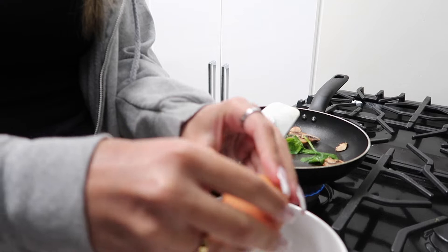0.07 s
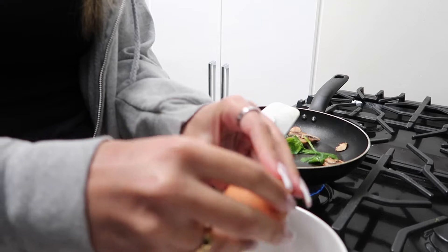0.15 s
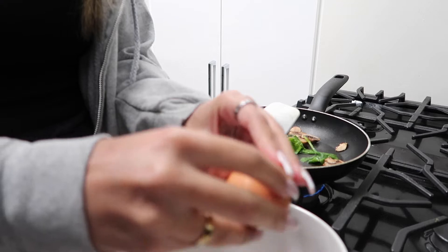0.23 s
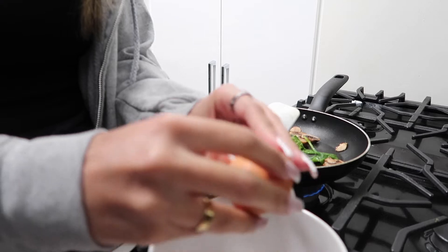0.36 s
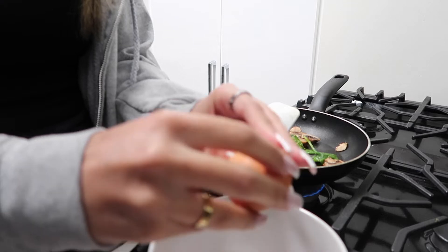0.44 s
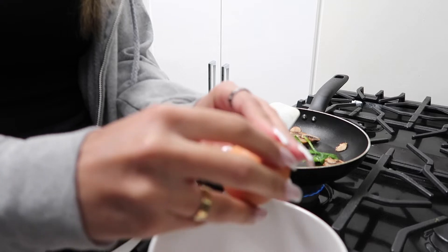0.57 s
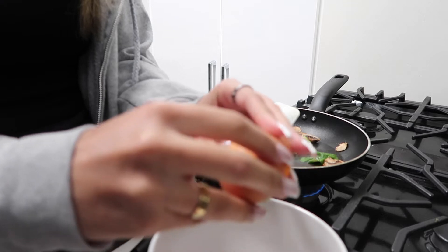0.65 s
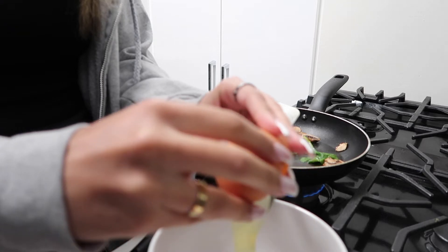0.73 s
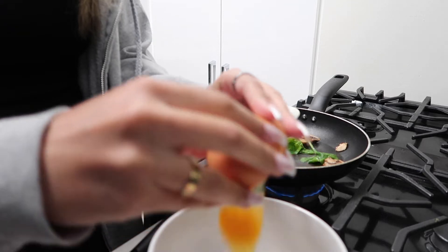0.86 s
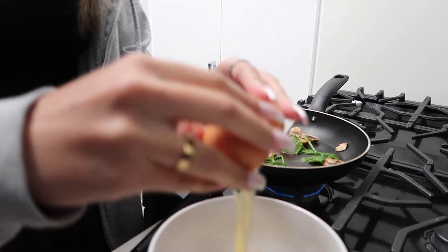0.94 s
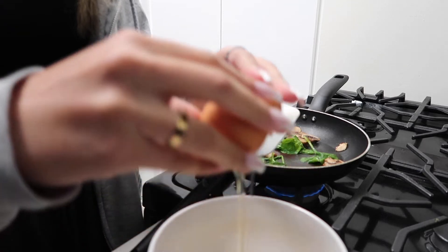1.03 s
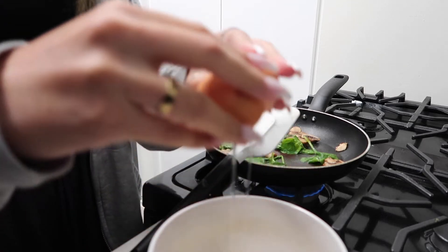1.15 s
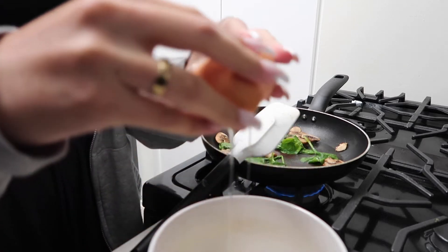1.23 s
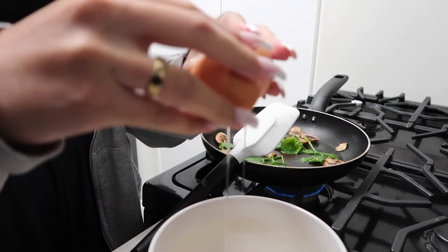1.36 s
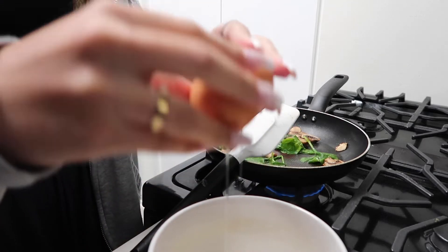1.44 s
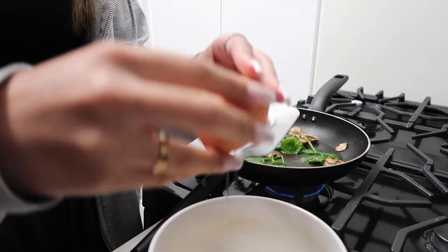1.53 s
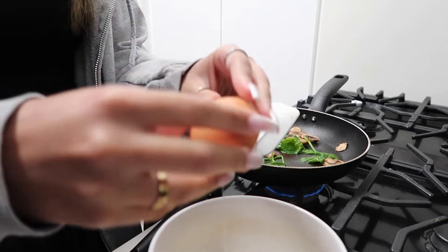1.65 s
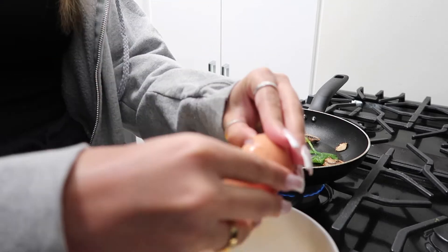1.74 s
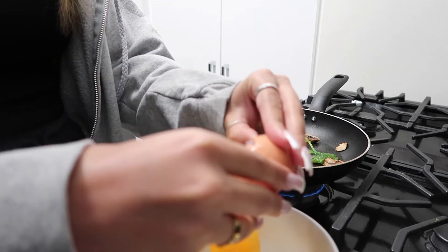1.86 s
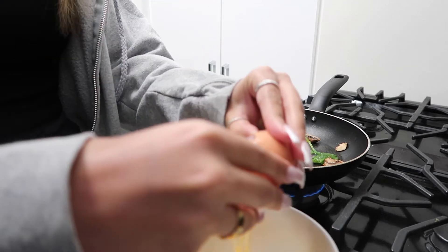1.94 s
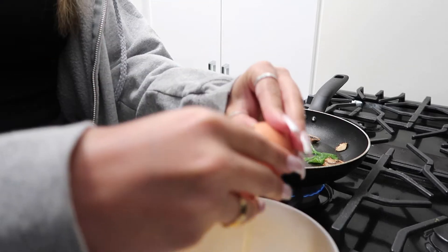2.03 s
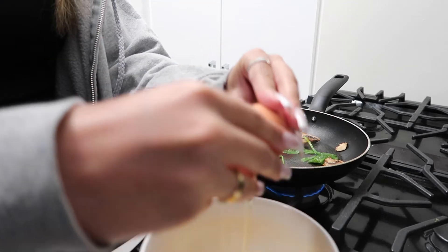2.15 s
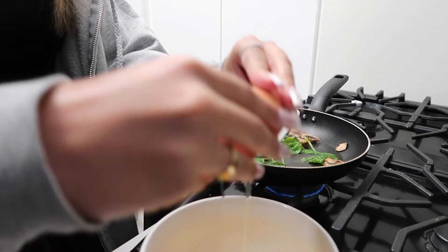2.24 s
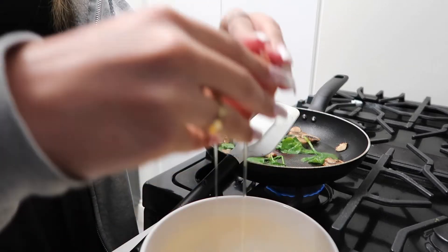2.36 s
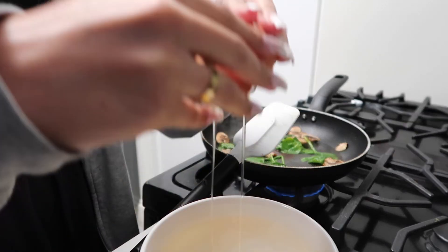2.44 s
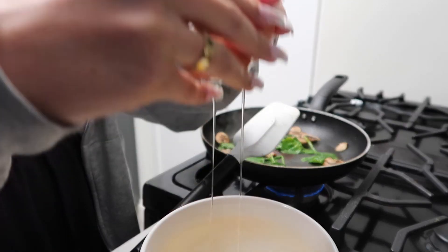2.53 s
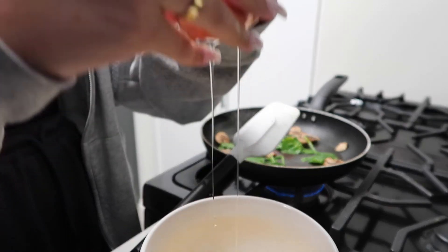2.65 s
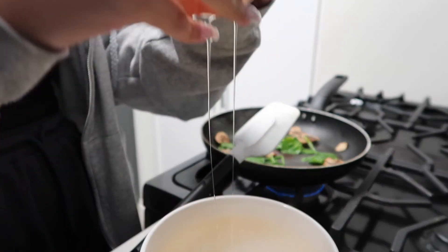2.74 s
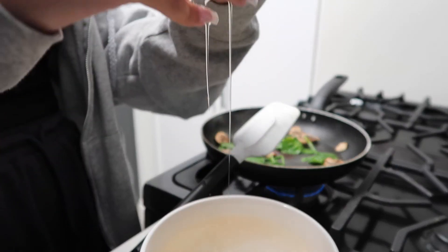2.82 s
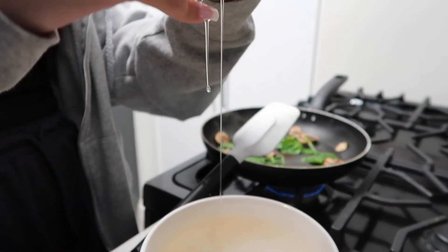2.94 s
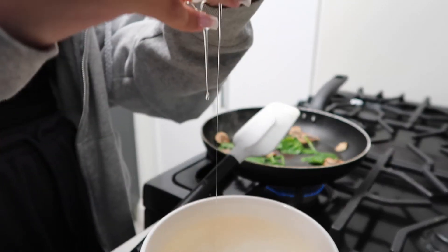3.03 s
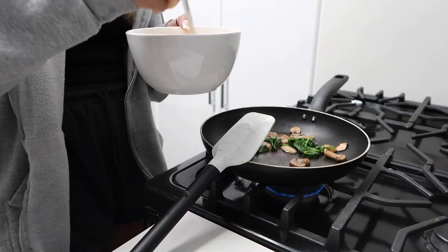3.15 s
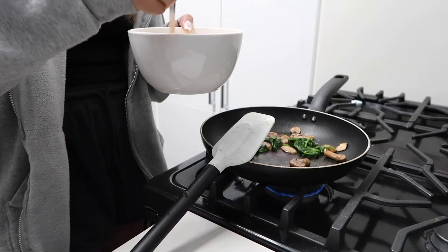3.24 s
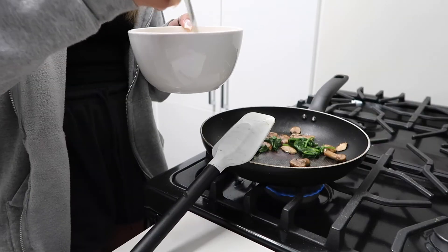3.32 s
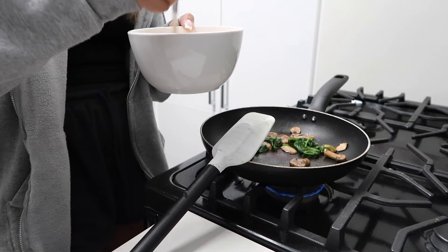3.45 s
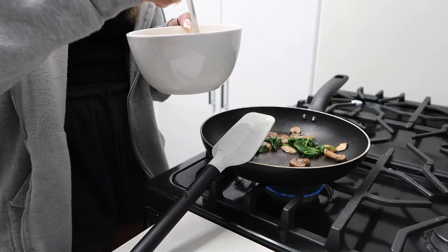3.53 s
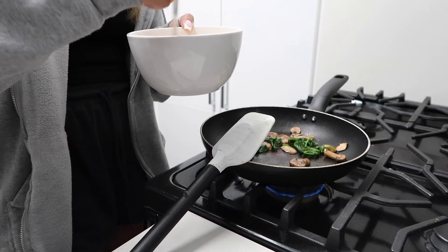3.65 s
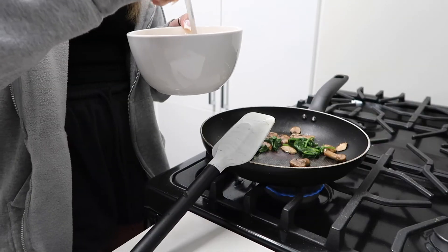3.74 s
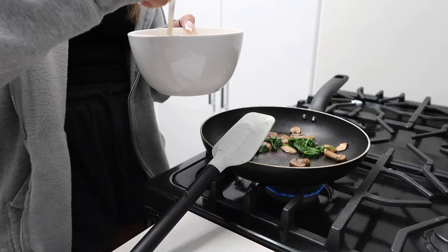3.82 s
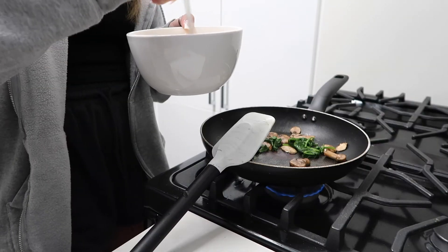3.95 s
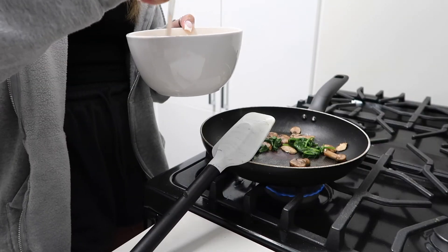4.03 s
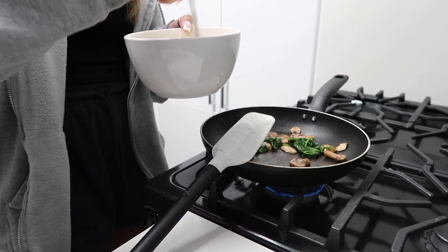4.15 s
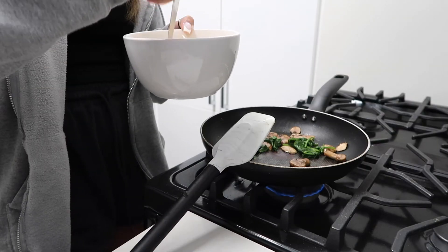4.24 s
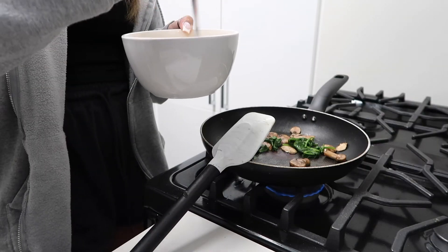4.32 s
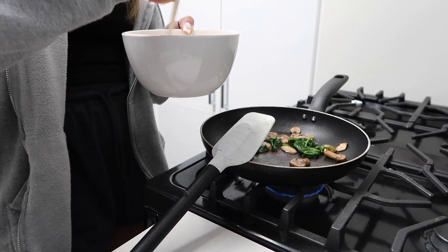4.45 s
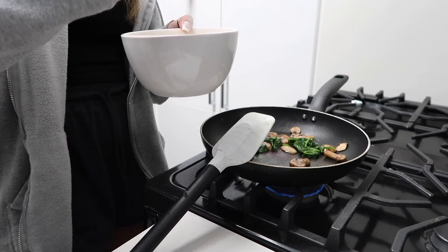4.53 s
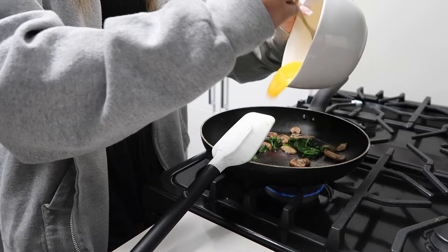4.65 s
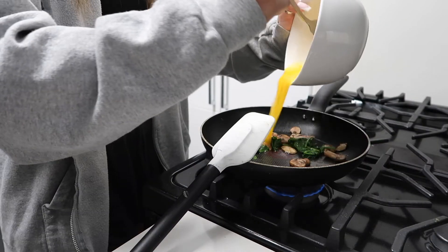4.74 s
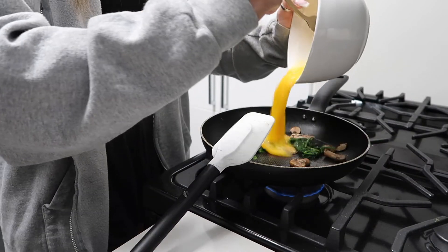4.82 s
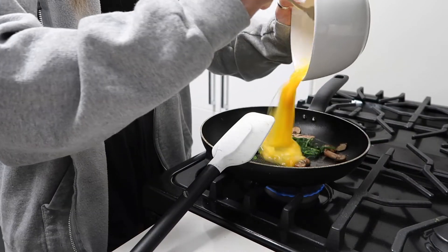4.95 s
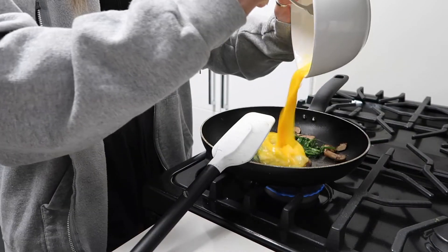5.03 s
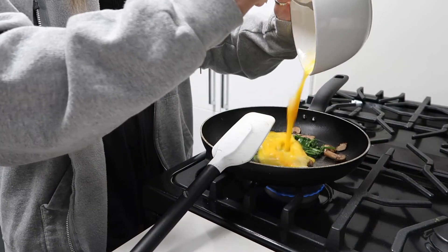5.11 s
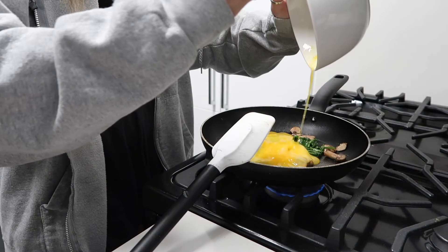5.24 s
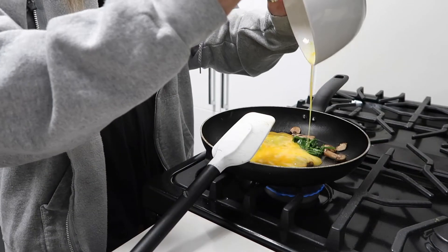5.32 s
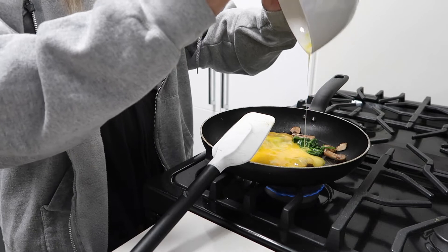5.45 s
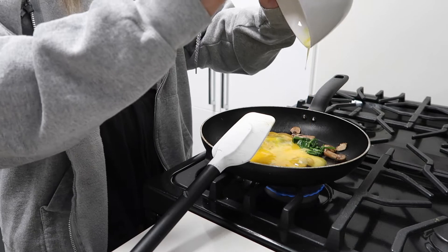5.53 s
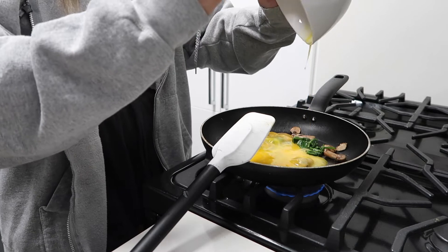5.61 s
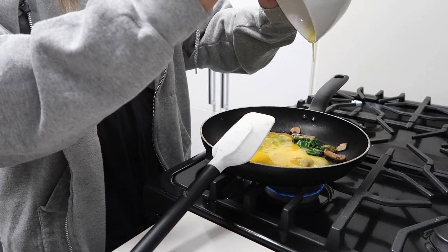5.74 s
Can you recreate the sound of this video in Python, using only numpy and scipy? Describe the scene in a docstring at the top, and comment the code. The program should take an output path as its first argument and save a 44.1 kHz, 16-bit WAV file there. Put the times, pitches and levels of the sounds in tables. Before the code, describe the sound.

Eggs crack sharply and crumble open over an extractor hum, a fork rings a ceramic bowl seven times, then egg plops softly into a pan.

```python
"""In a kitchen with an extractor fan and a gas hob, eggs are cracked, beaten and poured into a warm pan.
Shells snap and crumble as short damped knocks and bursts of noise; a fork rings a ceramic bowl seven times,
made of decaying sine waves. The egg slides in over filtered noise, a low hum and a faint sizzle of bubbles.
A gain control turns loud moments down in three separate parts: cracking, beating and pouring."""
import sys
import numpy as np
from scipy import signal
from scipy.fft import rfft, irfft, next_fast_len
from scipy.io import wavfile
from scipy.ndimage import uniform_filter1d

SR = 44100
rng = np.random.default_rng(int(sys.argv[2]) if len(sys.argv) > 2 else 0)


def file_out(sig):
    """Save sig as 16-bit WAV at sys.argv[1]."""
    # one column per channel
    cols = np.atleast_2d(sig).T
    # limit, then scale
    lim = np.clip(cols, -1, 1)
    pcm = np.round(lim * 32767).astype(np.int16)
    wavfile.write(sys.argv[1], SR, pcm)


N = 254898
T = np.arange(N) / SR  # time (s)
RING, BRIEF = T[:SR // 2], T[:SR // 8]  # time within a long and a short sound (s)

# Colour of the extractor fan and gas flame. Each row: frequency in Hz, relative level in dB.
KITCHEN_COLOUR = [(20, -23.5), (40, -8.5), (55, -14.5), (78, -7), (125, -5), (220, -5), (370, -13.5),
                  (420, -16), (600, -15.5), (780, -24.5), (1250, -28), (2700, -29), (6000, -43.5),
                  (15000, -57.5)]
# Tones of the hum. Each row: frequency in Hz, level in dB.
HUM_TONES = [(77, -50.5), (154.5, -40), (350, -51), (540, -57.5)]

# The egg covers the hot pan: start (s), time it takes (s), change in the hiss (dB)
COVER_AT_S, COVER_S, COVER_DB = 4.9, 0.58, -8.5
# Fine spray of the frying vegetables. Each row: frequency in Hz, relative level in dB.
SPRAY_COLOUR = [(2000, -14.5), (5000, -9), (8000, 9), (12000, -19), (15000, -18)]
# Egg landing in the pan, with pockets of air and spits of fat.
# Each row: start in seconds, length in seconds, level in dB, pitch in Hz.
EGG_SPLATS = [(4.887, .08, -42, 720), (4.988, .01, -45, 1700), (5.141, 0.014, -45.5, 7040),
              (5.203, 0.072, -44, 753)]

# Eggshell snaps. Each row: start in seconds, pitch of the hollow egg in Hz, its level in dB,
# pitch of the shell in Hz, its level in dB, splinter level in dB, splinter tilt in dB per octave,
# crack level in dB.
SHELL_SNAPS = [(0.3451, 3700, -28.5, 5130, -30, -34.5, 9, -38),
               (0.509, 2130, -35.5, 3780, -23, -42, 10, -36), (0.569, 1914, -35, 3020, -26.5, -42, -2, -42),
               (0.620, 2370, -19, 3500, -40, -44, 5, -40), (0.6302, 2240, -7.5, 3520, -25, -28, 18, -16.5),
               (1.0107, 1650, -11.5, 3520, -10.5, -30.5, 4, -24),
               (1.1464, 2110, -17.5, 3770, -43, -34, 7, -18),
               (1.552, 1990, -13.5, 2580, -14.5, -26, -1, -18),
               (1.758, 2570, -39, 3750, -25, -36.5, 15, -27.5), (2.044, 3040, -42, 3830, -28, -49, -7, -44),
               (2.049, 3650, -17, 4380, -28, -42, -5, -28)]
# Colour of the splinters before the tilt. Each row: frequency in Hz, relative level in dB.
SPLINTER_COLOUR = [(500, -37), (1500, 10.5), (3000, 3), (6500, 0), (10000, -19.5), (16000, -41)]
# Colour of the sudden crack. Each row: frequency in Hz, relative level in dB.
CRACK_COLOUR = [(800, -32), (1800, 4.5), (2800, 0), (5000, -5), (7500, -17), (11000, -22), (16000, -34)]
# Flakes of shell giving way as the thumbs pull the halves apart.
# Each row: start in seconds, length in seconds, level in dB, pitch in Hz.
SHELL_CRACKLES = [(0.085, 0.015, -31, 3000), (0.13, 0.0065, -29.5, 4760), (0.673, 0.006, -26, 2320),
                  (0.69, 0.013, -28, 3900), (0.881, .008, -39, 1900), (0.903, 0.016, -36, 2350),
                  (.9628, .008, -35, 5500), (1.387, 0.00495, -37, 2300), (1.445, 0.011, -33, 2400),
                  (1.608, 0.014, -30, 2380), (1.621, 0.008, -26.5, 3500), (1.623, .018, -29, 1250),
                  (1.636, .014, -31, 2700)]
# Rings around the snaps: the opened shell, and near 4.2 kHz the bowl, brushed by the shell.
# Each row: start in seconds, pitch in Hz, level in dB, time to fade by 60 dB in seconds,
# sag as a share of the pitch, wobble as a share of the pitch.
SNAP_RINGS = [(0.634, 2165, -23, 0.15, 0.072, 0.051), (1.017, 1320, -16.5, 0.022, 0.099, 0.043),
              (.964, 4250, -44, .08, 0.037, .015), (1.013, 4170, -42.5, 0.32, .005, .003),
              (1.152, 2100, -31, .06, .06, 0.093), (1.558, 1860, -22.5, 0.094, .02, .06)]

BEAT_START, BEAT_END = 3.09, 4.583  # the fork is heard between these times (s)
# Blows of the fork on the bowl. Each row: start in seconds, force in dB, clack in dB relative to the force,
# clack fade by 60 dB in seconds, contact time in seconds, tine pitch in Hz, tine level in dB relative
# to the force, thud in dB relative to the force, later swell of the second rim family in dB,
# then the level in dB of each of the four rim families, set by where the fork lands.
FORK_BLOWS = [(3.1239, -18, 13, 0.031, 0.0015, 12300, -3, 2, 5.5, 0, -3, 0, -2.5),
              (3.32, -15, 12.8, 0.019, 0.00072, 12200, -6.5, -1.5, 7, -2, -1, -2.5, 0),
              (3.5152, -14.5, 13.5, 0.029, 0.0015, 12200, -7, 0, 5.5, -7, -1.5, -0.5, -7.5),
              (3.7244, -15.5, 9.2, 0.031, 0.0012, 12800, -7, -0.5, 7, -2, -6, -7.5, -3.5),
              (3.9126, -22.5, 19.9, 0.026, 0.00076, 14000, 9.5, 6, 0.5, 0, 4.5, 2, -6),
              (4.1106, -20, 17.9, 0.023, 0.0011, 13900, 7.5, -1.5, 1.5, -2.5, -7, 1, 1),
              (4.3351, -23.5, 9.5, 0.059, 0.0021, 13400, 4, 0, -3, 2.5, -0.5, 1, -4.5)]
# Ceramic bowl: four main rim modes (ways of ringing), then their close partners and the high modes.
# Each row: frequency in Hz, relative level in dB, time to fade by 60 dB in seconds.
BOWL_MODES = [(1053, -1.3, 1.4), (2616, 3.8, .46), (4740, -1, .22), (7320, -1.5, .18), (2619, -11, 1.0),
              (4733, -19, .7), (7330, -25, .5), (2580, -19, .2), (4770, -12, .35), (4700, -9, .22),
              (4620, -4, .07), (4520, -15, .25), (4170, -17, .25), (5430, -24, .22), (6200, -23, .12),
              (7290, -13, .2), (8620, -13, .12), (10340, -5, .18)]
# Pitches that part the four families of rim modes, in Hz.
FAMILY_LIMITS_HZ = [2000, 3500, 6000]
# How strongly the steel tip drives each pitch. Each row: frequency in Hz, relative level in dB.
TIP_STRIKE = [(1050, -2.5), (2600, -2), (4700, 4), (7300, 5.5), (13000, -38)]
# The second rim family swells again (dips, if negative) shortly after the blow: delay (s), half length (s)
SWELL_AT_S, SWELL_S = 0.054, 0.042
# Steel tines. Each row: frequency in Hz, relative level in dB, time to fade by 60 dB in seconds.
STEEL_TINES = [(11550, -4, .14), (11950, 1, 0.12), (12480, -3, 0.08), (12890, -3, .07), (13150, -5, 0.12),
               (13830, -10, .14)]
TINE_REACH_HZ = 800  # tine modes this far from a blow's tine pitch ring at half strength
# Colour of the contact clack. Each row: frequency in Hz, relative level in dB.
CLACK_COLOUR = [(400, -15.5), (650, -8.5), (820, -13.5), (1080, -1.5), (1500, -7), (2000, -2.5), (2500, 10),
                (3300, -6), (3900, -7.5), (4600, 6), (5700, -8), (7300, 2.5), (9000, -14.5), (10200, -3.5),
                (11000, -14.5), (11700, -5.5), (13500, -5.5), (16000, -30)]
# The wall thuds while the fork still presses on it: pitch (Hz), swell (cycles)
THUD_HZ, THUD_CYCLES = 1055, 3.6
# The fork sweeps through the egg: lead before the blow (s), half length (s), level (dB)
SWEEP_LEAD_S, SWEEP_S, SWEEP_DB = 0.02, 0.023, -41
# Colour of the sweep. Each row: frequency in Hz, relative level in dB.
SWEEP_COLOUR = [(250, -10), (550, 9), (900, -2), (2500, -3), (7000, -5), (13500, -16), (16000, -30)]
# Tines grazing the bowl between blows. Each row: middle of the graze in seconds, level in dB.
TINE_GRAZES = [(3.428, -40), (3.998, -37), (4.224, -39), (4.447, -39.5), (4.566, -36.5)]
# Colour of the grazing tines. Each row: frequency in Hz, relative level in dB.
GRAZE_COLOUR = [(1500, -29), (3700, -24), (4250, 2), (4750, -4), (5400, -9), (7900, -10), (10000, -12),
                (15500, -32)]
GRAZE_S = 0.014  # half length of a graze (s)

# Gain control: reduction as the beating begins (dB), time over which loudness is sensed (s)
HELD_DB, SENSE_S = 6.5, .025
TOP_HZ = 16200  # nearly everything above this is cut


def undb(db):
    """Turn decibels into a plain gain."""
    return 10 ** (np.asarray(db) / 20)


def unit(x):
    """Scale to an rms (average strength) of 1."""
    return x / np.sqrt(np.mean(x ** 2))


def fade(t, t60):
    """Die away exponentially, by 60 dB in t60 seconds."""
    return np.exp(-np.log(1000) * t / t60)


def on_log(points, freqs):
    """Read between (Hz, value) points on a log-frequency axis."""
    f, value = np.transpose(points)
    return np.interp(np.log(freqs + 1), np.log(f), value)


def noise(points, size):
    """Make noise of rms 1, coloured by (Hz, relative dB) points."""
    spectrum = rfft(rng.standard_normal(size))
    colour = undb(on_log(points, np.fft.rfftfreq(size, 1 / SR)))
    return unit(irfft(spectrum * colour, size))


def walk(rate, size=N):
    """Drift at random about zero, with `rate` new values per second joined by straight lines."""
    knots = rng.standard_normal(int(size / SR * rate) + 2)
    return np.interp(T[:size] * rate, np.arange(len(knots)), knots)


def add(track, s, sound):
    """Mix a sound in at time s (seconds)."""
    i = int(s * SR)
    track[i:i + len(sound)] += sound[:N - i]


def knock(hz, cycles, sag=0):
    """A heavily damped resonance that swells for a few cycles and dies, sinking in pitch by sag."""
    age = BRIEF * hz / cycles
    swell = age * np.exp(1 - age)  # peak 1
    pitch = hz * (1 + sag * np.exp(-age / 2) - sag / 2)
    return swell * np.sin(2 * np.pi * np.cumsum(pitch) / SR)


def around(hz, octaves, draw):
    """Turn a random draw from 0 to 1 into a pitch up to some octaves above or below hz."""
    return hz * 2 ** (octaves * (2 * draw - 1))


def cluster(length, hz, cycles, spread_octaves, uneven_db, count):
    """A run of tiny knocks about one pitch; the first leads, the others follow at random and weaker."""
    out = np.zeros(len(RING))
    add(out, 0, knock(hz, cycles))
    for when, pitch, size in rng.random((count, 3)):
        add(out, when * length, undb(-uneven_db * size) * knock(around(hz, spread_octaves, pitch), cycles))
    return out


def room(x, wet_db, t60=0.18, near_db=-8, near_t60=0.085, gap=.005, width=0.18):
    """Direct sound, quick reflections from worktop and cupboards, and the short tail of the kitchen."""
    far = fade(RING, t60) * undb(wet_db) / np.sqrt(t60)
    near = fade(RING, near_t60) * undb(near_db) / np.sqrt(near_t60)
    tail = (far + near) * np.sqrt(2 * np.log(1000) / SR)
    wait = np.zeros(int(gap * SR))

    def echo():
        """Smear the sound with a fresh noisy tail."""
        return signal.fftconvolve(x, np.r_[wait, tail * rng.standard_normal(len(RING))])[:N]

    mid, side = echo(), echo()
    return x + mid + width * np.array([side, -side])


def covered():
    """Share of the pan that lies under egg, 0-1."""
    return np.clip((T - COVER_AT_S) / COVER_S, 0, 1)


def kitchen(rush_db=-35.5, side_db=-53, waver=0.2, wander_hz=3, hiss_edge_hz=1800):
    """The extractor hums and rushes unevenly; flame and pan hiss above it until the egg covers the pan."""
    rush = noise(KITCHEN_COLOUR, N) * undb(rush_db + 1.05 * walk(4.413))
    high_pass = signal.butter(1, hiss_edge_hz, "high", fs=SR, output="sos")
    hiss = signal.sosfilt(high_pass, rush)
    # the hiss is already in the rush, so only its change is added
    rush = rush + hiss * (undb(COVER_DB * covered()) - 1)
    hum = np.zeros(N)
    for hz, db in HUM_TONES:
        size = undb(db) * np.sqrt(2) * (1 + waver * walk(13))
        hum += size * np.sin(2 * np.pi * np.cumsum(hz + wander_hz * walk(20)) / SR)
    side_colour = [(50, 0.0), (130, -16.0), (230, 22.5), (450, 19.0), (900, 13.5),
                   (2000, 3), (5000, 7.5), (15000, -27.0)]  # (Hz, relative dB)
    side = undb(side_db) * noise(side_colour, N)  # opposite in left and right
    return rush + hum + np.array([side, -side])


def bubbles(count, start, end, hz, db, cycles, spread_db=3, spread_octaves=.35):
    """Small bubbles burst at random between two times, each a knock with its own pitch and strength."""
    out = np.zeros(N)
    for when, pitch, size in rng.random((count, 3)):
        level = undb(db - spread_db * np.log(size + 0.176))
        add(out, start + when * (end - start), level * knock(around(hz, spread_octaves, pitch), cycles))
    return out


def pan(spray_db=-63, smother_db=-10, late_hiss_db=-75, late_hiss_at_s=5.4, late_hiss_rise_s=0.33):
    """Vegetables sizzle; the egg plops in and smothers their spray; a very faint high hiss rises late."""
    sizzle = bubbles(count=480, start=0, end=5.25, hz=7500, db=-60, cycles=.6, spread_octaves=.7)
    spray = noise(SPRAY_COLOUR, N) * undb(spray_db + smother_db * covered())
    gurgle = bubbles(count=40, start=4.6, end=5.7, hz=1900, db=-54, cycles=2, spread_octaves=.6)
    # a very faint, uneven high hiss rises near the end
    late_hiss = noise([(4000, -25), (8000, -6), (12000, 3), (16000, -25)], N)  # (Hz, relative dB)
    late_hiss = late_hiss * unit(undb(5 * walk(900)))
    late_hiss = late_hiss * undb(late_hiss_db) * np.clip((T - late_hiss_at_s) / late_hiss_rise_s, 0, 1)
    splats = np.zeros(N)
    for s, length, db, hz in EGG_SPLATS:
        splat = cluster(length, hz, cycles=2.0, spread_octaves=0.36, uneven_db=2.0, count=6)
        add(splats, s, undb(db) * splat)
    return spray + room(sizzle + gurgle + splats + late_hiss, wet_db=-5.5)


def wobbling_ring(hz, t60, sag, wobble, sag_s=0.013, rise_s=0.0011, waver_db=3):
    """An opened shell or brushed bowl: an uneven fading sine that wobbles and settles onto its pitch."""
    pitch = hz * (1 + sag * np.exp(-RING / sag_s) + wobble * walk(450, len(RING)))
    size = (1 - np.exp(-RING / rise_s)) * fade(RING, t60) * undb(waver_db * walk(235, len(RING)))
    return size * np.sin(2 * np.pi * np.cumsum(pitch) / SR)


def shell_splinters(tilt, crumble_t60=0.06, grain_db=6):
    """Tiny splinters: fading noise whose loudness jumps at random every 32 samples."""
    steps = np.repeat(rng.standard_normal(len(BRIEF)), 32)[:len(BRIEF)]
    grains = unit(undb(grain_db * steps))
    colour = [(hz, db + tilt * np.log2(hz)) for hz, db in SPLINTER_COLOUR]
    return noise(colour, len(BRIEF)) * grains * fade(BRIEF, crumble_t60)


def eggshell(cavity_cycles=1.7, shell_cycles=2.74, sag=0.15, crumb_db=-18, crumb_s=0.0062, crack_t60=0.0037):
    """Each snap cracks, knocks the hollow egg and its shell, and sheds crumbs; flakes crackle too."""
    out = np.zeros(N)
    for s, cavity_hz, cavity_db, shell_hz, shell_db, splinter_db, tilt, crack_db in SHELL_SNAPS:
        snap = undb(cavity_db) * knock(cavity_hz, cavity_cycles, sag)
        snap += undb(shell_db) * knock(shell_hz, shell_cycles, sag)
        snap += undb(splinter_db) * shell_splinters(tilt)
        snap += undb(crack_db) * noise(CRACK_COLOUR, len(BRIEF)) * fade(BRIEF, crack_t60)
        add(out, s, snap)
        # the fracture runs on in smaller, later steps, pitched between cavity and shell
        for wait, pitch in rng.random(size=(7, 2)):
            level = undb(max(cavity_db, shell_db) + crumb_db) * (1 - wait)
            crumb = knock(cavity_hz + pitch * (shell_hz - cavity_hz), 0.31)
            add(out, s - crumb_s * np.log(1 - wait), level * crumb)
    for s, length, db, hz in SHELL_CRACKLES:
        crackle = cluster(length, hz, cycles=0.61, spread_octaves=0.76, uneven_db=5.5, count=8)
        add(out, s, undb(db) * crackle)
    for s, hz, db, t60, ring_sag, wobble in SNAP_RINGS:
        add(out, s, undb(db) * wobbling_ring(hz, t60, ring_sag, wobble))
    return room(out, wet_db=-15, t60=0.25, near_db=-8.5, near_t60=0.05, width=0.12)


def bowl_ring(family_db, swell_db, detune=0.00029, slosh_per_khz=0.26, slosh_rate=90, tilt_db=3.0, tilt_rate=14):
    """One blow's rim modes, as fading sines; close partners beat against each other."""
    ring = np.zeros(len(RING))
    # the second family swells again shortly after the blow
    swell = swell_db * np.exp(-((RING - SWELL_AT_S) / SWELL_S) ** 2)
    for hz, db, t60 in BOWL_MODES:
        pitch = hz * (1 + detune * rng.standard_normal())
        family = np.searchsorted(FAMILY_LIMITS_HZ, hz)  # 0-3
        gain = undb(db + on_log(TIP_STRIKE, hz) + family_db[family] + swell * (family == 1))
        # sloshing egg and the moving bowl make the short waves waver most
        depth = np.minimum(slosh_per_khz * hz / 1000, 1) * (1 if family > 1 else .5)
        waver = depth * walk(slosh_rate, len(RING))
        angle = 2 * np.pi * (pitch * RING + rng.random())
        # the bowl rocks in the hand, so each mode comes and goes
        rocking = undb(tilt_db * walk(tilt_rate, len(RING)))
        ring += gain * rocking * fade(RING, t60) * (np.sin(angle) + waver * np.cos(angle))
    return ring


def tine_ring(pitch_hz, flutter=0.33):
    """The steel tines sing briefly near one pitch and flutter as they chatter on the glaze."""
    ring = np.zeros(len(RING))
    for hz, db, t60 in STEEL_TINES:
        nearness = 1 / (1 + ((hz - pitch_hz) / TINE_REACH_HZ) ** 2)
        size = undb(db) * nearness * fade(RING, t60) * (1 + flutter * walk(270, len(RING)))
        ring += size * np.sin(2 * np.pi * (hz * RING + rng.random()))
    return ring


def rub(colour, half_s, grain_db=3):
    """Gritty friction: noise that swells and fades about the middle of its length."""
    grit = unit(undb(grain_db * walk(403, len(BRIEF))))
    swell = np.exp(-((BRIEF - BRIEF.mean()) / half_s) ** 2)
    return noise(colour, len(BRIEF)) * grit * swell


def fork(damp_s=0.0094):
    """The fork sweeps through the egg and clacks on the wall; where it lands decides which modes ring."""
    rings, clacks = np.zeros(N), np.zeros(N)
    half = BRIEF.mean()  # puts the middle of a rub at the wanted time
    for (s, force_db, clack_db, clack_t60, contact_s, tine_hz, tine_db, thud_db, swell_db,
         *family_db) in FORK_BLOWS:
        touch = 1 - np.exp(-RING / contact_s)
        # the new contact damps what was still ringing
        rings[int(s * SR):] *= fade(T[:N - int(s * SR)], damp_s)
        ring = bowl_ring(family_db, swell_db) + undb(tine_db) * tine_ring(tine_hz)
        add(rings, s, undb(force_db) * touch * ring)
        add(rings, s, undb(force_db + thud_db) * knock(THUD_HZ, THUD_CYCLES))
        clack = touch[:len(BRIEF)] * noise(CLACK_COLOUR, len(BRIEF)) * fade(BRIEF, clack_t60)
        add(clacks, s, undb(force_db + clack_db) * clack)
        add(clacks, s - SWEEP_LEAD_S - half, undb(SWEEP_DB) * rub(SWEEP_COLOUR, SWEEP_S))
    for s, db in TINE_GRAZES:
        add(clacks, s - half, undb(db) * rub(GRAZE_COLOUR, GRAZE_S))
    rings = room(rings, wet_db=-21, t60=.4, near_db=-24, near_t60=.05, width=1)
    return rings + room(clacks, wet_db=-10.5, t60=0.74, near_db=-3.0, near_t60=0.096, width=0.075)


def ports(air, corner_hz=4800, most=2.69):
    """The two microphone ports agree in the bass and fall out of step (radians) in the treble."""
    size = next_fast_len(N + SR)
    rise = (np.fft.rfftfreq(size, 1 / SR) / corner_hz) ** 4
    turn = most * rise / (1 + rise)
    # half the turn goes to each side, in opposite directions
    return irfft(rfft(air, size) * np.exp(.5j * np.array([-turn, turn])), size)[:, :N]


def turned_down(x, held_db=None, threshold_db=-20.0, slope=0.98, release_db_per_s=9):
    """Gain reduction in dB: it follows loud sound up, from held_db if given, and creeps back slowly."""
    step = 1 / (SENSE_S * SR)
    power = signal.lfilter([step], [1, step - 1], np.mean(x ** 2, axis=0))
    over = np.maximum(slope * (10 * np.log10(power + 1e-12) - threshold_db), 0)
    if held_db is not None:
        over[0] = held_db
    creep = release_db_per_s * T[:len(over)]
    return np.maximum.accumulate(over + creep) - creep


def scene():
    """Kitchen and pan run throughout, shells crack, and the fork is heard only during the beating."""
    beating = (T > BEAT_START) & (T < BEAT_END)
    return ports(kitchen() + pan() + eggshell() + fork() * beating)


def record(dry):
    """Each part has its own gain control; the beating begins already turned down. The top is cut."""
    edges = [int(BEAT_START * SR), int(BEAT_END * SR)]
    cracking, beating, pouring = np.split(dry, edges, axis=1)
    down_db = np.hstack([turned_down(cracking), turned_down(beating, held_db=HELD_DB), turned_down(pouring)])
    # a short average softens the steps in gain
    levelled = dry * undb(-uniform_filter1d(down_db, size=128))
    low_pass = signal.ellip(8, .2, 80, TOP_HZ, fs=SR, output="sos")
    return signal.sosfilt(low_pass, levelled)


dry = scene()
out = record(dry)
file_out(out)
```